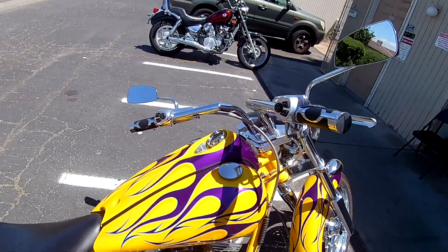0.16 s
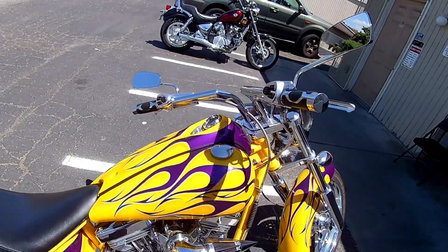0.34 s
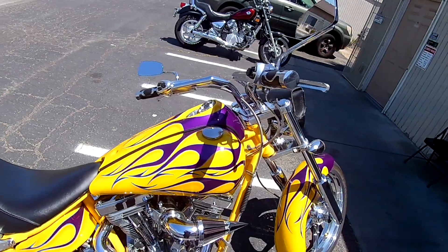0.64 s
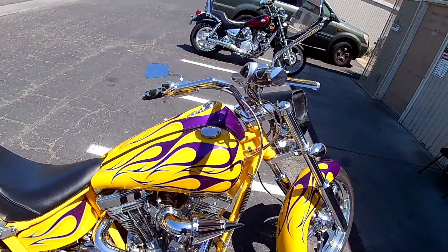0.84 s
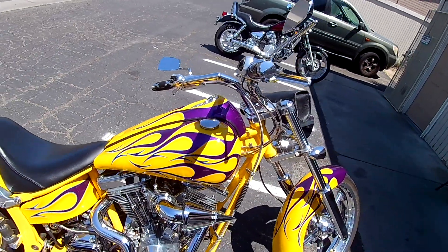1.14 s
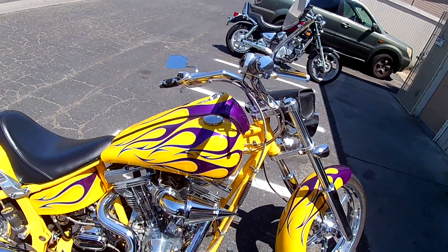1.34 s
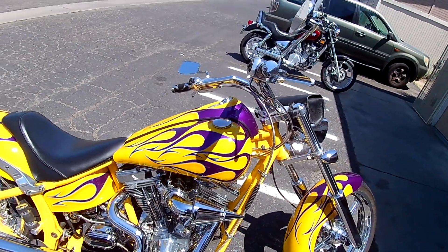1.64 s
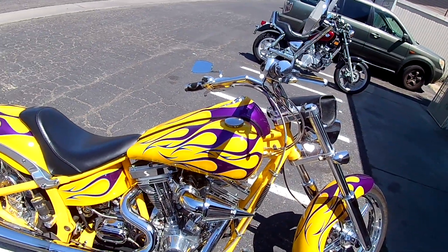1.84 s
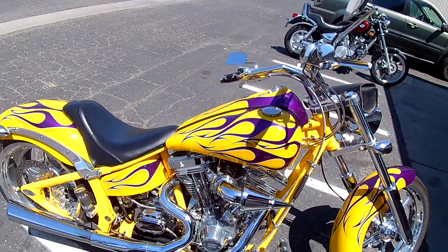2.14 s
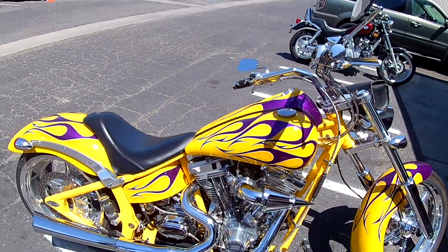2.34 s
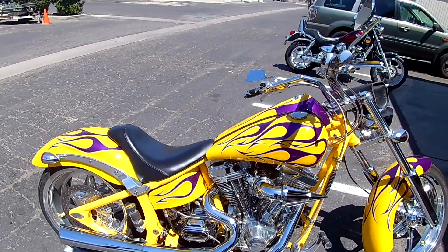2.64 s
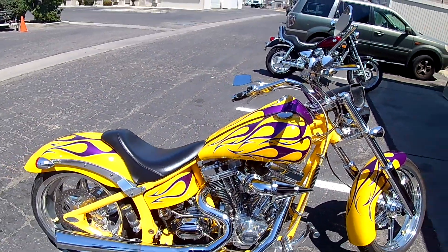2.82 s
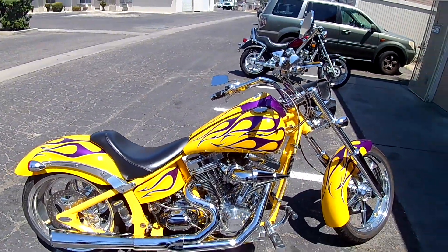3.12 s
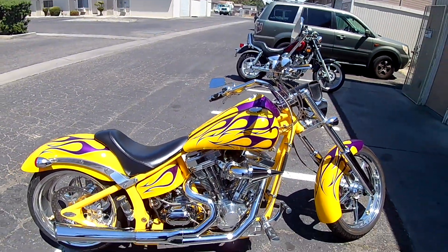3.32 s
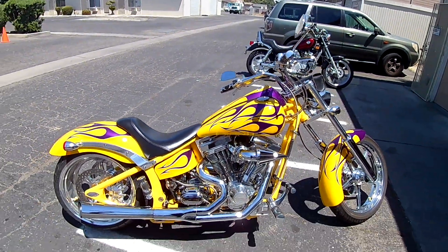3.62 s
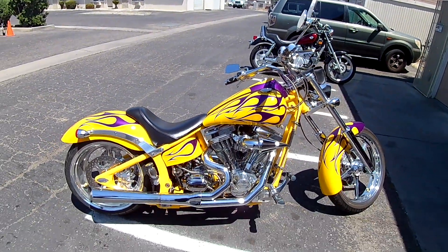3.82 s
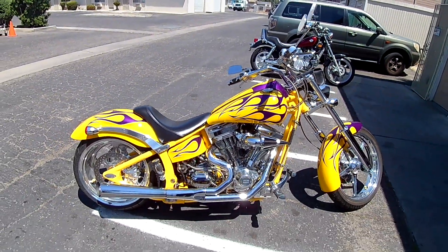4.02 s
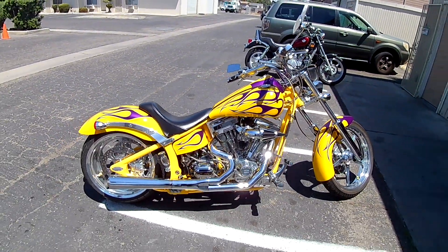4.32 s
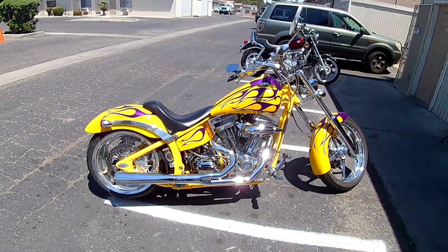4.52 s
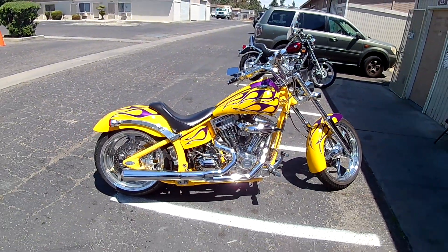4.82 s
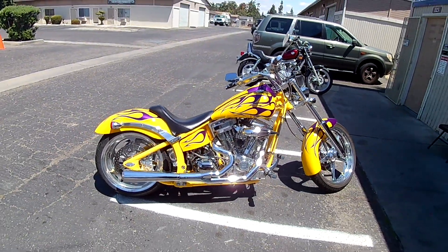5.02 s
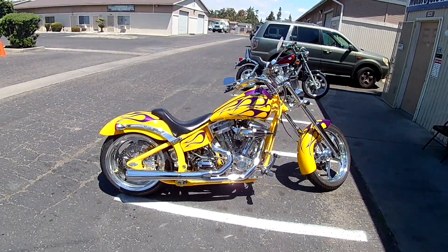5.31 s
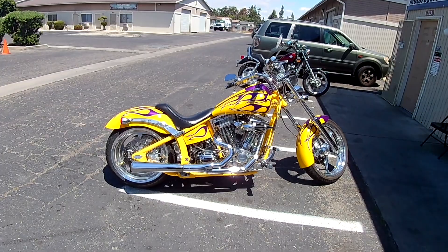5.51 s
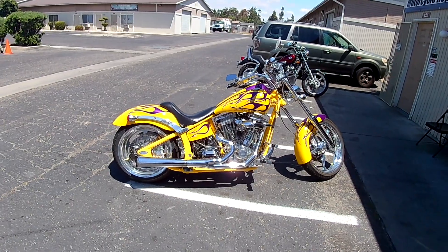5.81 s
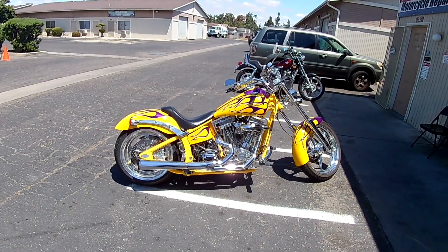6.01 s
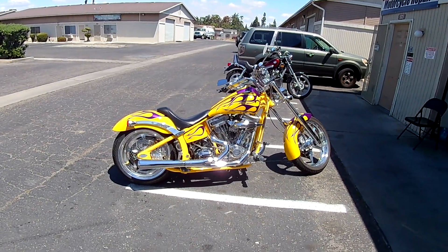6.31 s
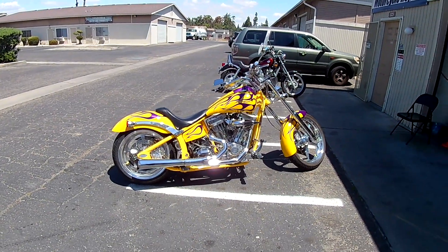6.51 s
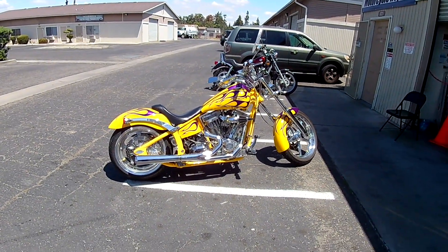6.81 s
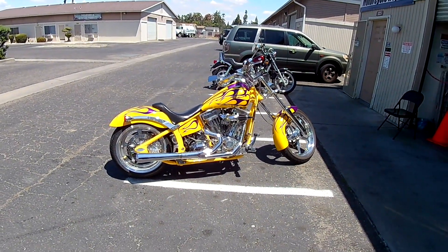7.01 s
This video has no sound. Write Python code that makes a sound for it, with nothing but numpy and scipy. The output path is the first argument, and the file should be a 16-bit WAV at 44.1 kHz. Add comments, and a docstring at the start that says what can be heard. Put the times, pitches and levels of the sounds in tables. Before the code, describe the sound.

Deep, lumpy thumping of an idling motorcycle, with paired exhaust cracks, metallic engine clatter and a few low gusts of wind.

```python
"""From the start a big V-twin chopper lopes at a slow idle through open pipes in a parking lot.
Its cylinders fire mostly in pairs and miss in between: every exhaust stroke sets the pipes booming,
and each firing cracks. At first the listener is beside the tank, near the clatter and carburettor hiss.
After about a second a breeze starts to buffet the microphone in gusts. From about two seconds on the
listener backs away to the pipe side, where the clatter fades and the cracks grow stronger."""
import sys
import numpy as np
from scipy import signal
from scipy.fft import rfft, irfft, next_fast_len
from scipy.io import wavfile
from scipy.ndimage import uniform_filter1d

SR = 44100
rng = np.random.default_rng(int(sys.argv[2]) if len(sys.argv) > 2 else 0)


def put_to_file(sound):
    """Save the sound as 16-bit audio at rate SR, in the file named by the first command-line argument."""
    columns = np.atleast_2d(sound).T  # one column per channel
    safe = np.clip(columns, -1, 1)
    whole_steps = np.round(safe * 32767)
    wavfile.write(sys.argv[1], SR, whole_steps.astype(np.int16))


N = 315315
TIME = np.arange(N) / SR

# firings, mostly in pairs, front cylinder then rear: start_s, boom_db, boom_start_hz, valve_open_s,
# crack_db, edge_db, low_bark_hz, low_bark_db, high_bark_hz, high_bark_db
FIRINGS = [(-0.042, 2.5, 52.3, 0.07, -33, -49.5, 980, -40.5, 1217, -46.0),
           (0.0329, 1.0, 54.6, 0.092, -30.5, -49.5, 680, -39.0, 1367, -38),
           (0.3161, 0, 57.9, 0.069, -29.5, -43.0, 630, -29, 990, -32),
           (0.4237, 3.0, 52.8, 0.082, -32, -51.0, 650, -33.0, 1744, -35),
           (0.7065, 2, 56, 0.085, -30, -39.5, 926, -38, 1744, -39.0),
           (0.8186, 2, 51.8, 0.071, -32.5, -45, 668, -36, 980, -43),
           (1.1106, 1, 57.5, 0.085, -28.5, -59, 950, -39, 1227, -40),
           (1.2063, 2.0, 56, 0.09, -31.5, -36.0, 1012, -39.0, 1346, -42),
           (1.4877, -2, 54.8, 0.13, -29.5, -48.5, 969, -45, 1238, -36),
           (1.7277, -0.5, 57, 0.07, -28.5, -41.5, 1244, -36.5, 1590, -34),
           (1.8429, 1.5, 53, 0.079, -33, -36.5, 1034, -37.0, 1453, -39),
           (2.1512, 0, 55, 0.1, -26.5, -42.5, 790, -37, 1570, -37.5),
           (2.256, 3, 50.7, 0.064, -26, -37.5, 700, -40, 1015, -29),
           (2.5234, 0, 54.6, 0.094, -31, -43.5, 1529, -32, 1850, -35),
           (2.8574, 0.0, 51.7, 0.077, -35, -46.5, 678, -45, 1040, -31),
           (2.946, 1, 56, 0.11, -25.5, -47, 1292, -38, 1518, -28.0),
           (3.271, 0.5, 53.4, 0.09, -33, -60.5, 969, -33.5, 1660, -38.5),
           (3.3542, 0, 54, 0.098, -26.5, -42.5, 1006, -32.5, 1450, -30),
           (3.7063, 0.5, 55.3, 0.096, -30.5, -58.5, 657, -33.5, 958, -32.5),
           (3.7845, 2.5, 53.5, 0.092, -21, -39.5, 1060, -38, 1500, -32),
           (4.1854, -1.5, 58.5, 0.13, -21, -47, 1374, -25, 1634, -23),
           (4.289, -0.5, 52.5, 0.074, -25.0, -52.5, 1046, -28.5, 1660, -28.5),
           (4.594, -2, 55.3, 0.076, -25.5, -45, 820, -32.0, 1624, -23.5),
           (4.7055, 0.5, 50.4, 0.092, -22.5, -39.0, 693, -28.0, 958, -36),
           (4.9896, -2.0, 54, 0.1, -25.5, -44.5, 1350, -29.5, 1640, -28),
           (5.0971, -1, 52, 0.088, -32, -54.5, 650, -36, 1087, -32),
           (5.4132, -2.5, 55.9, 0.12, -24.5, -45.0, 1055, -30, 1367, -38.0),
           (5.521, 2.5, 57.3, 0.074, -25.5, -45, 686, -25, 1450, -44),
           (5.803, -2.5, 54.2, 0.076, -26, -43.5, 870, -31.5, 1790, -33),
           (5.9242, -2.5, 49, 0.081, -37, -55, 660, -40, 1430, -35),
           (6.2364, -3, 55.4, 0.069, -29.5, -47, 894, -39, 1410, -41),
           (6.352, -3.5, 55.3, 0.081, -33.5, -53, 670, -35, 1650, -40),
           (6.689, -4, 57.7, 0.068, -28, -42, 1095, -33, 1680, -30),
           (6.8, 0.0, 52.7, 0.083, -26.5, -43, 700, -30.5, 1054, -26.5)]
# exhaust strokes without a bang: start_s, boom_db, boom_start_hz, valve_open_s, intake_lag_s, hiss_db
MISFIRES = [(0.1233, 0.5, 55.3, 0.058, 0.012, -55.5), (0.234, -6, 53, 0.11, -0.0, -53.5),
            (0.511, 1, 49.3, 0.082, 0.013, -55.0), (0.6223, 1, 51.5, 0.082, 0.00024, -54.5),
            (0.8983, -2.0, 56.6, 0.111, 0.045, -54.5), (1.0209, 3.5, 54.3, 0.094, 0.01, -55),
            (1.29, -2, 52.6, 0.09, 0.015, -55.5), (1.4006, 2.0, 50.9, 0.093, 0.0054, -56.5),
            (1.6247, 1.5, 54.2, 0.1, 0.0059, -52), (1.919, 0.5, 54.6, 0.082, 0.032, -55.5),
            (2.0559, -2, 49.7, 0.081, 0, -55.5), (2.3383, 0.5, 55, 0.1, 0.0075, -60.5),
            (2.4455, 2, 53, 0.083, 0, -60), (2.6172, -7, 54.5, 0.133, 0.033, -55.5),
            (2.7353, -4, 52.1, 0.09, 0.021, -57), (3.054, 0.5, 47.2, 0.059, 0.0038, -59.5),
            (3.1448, 0, 50.8, 0.09, 0.021, -56), (3.46, 1, 52.5, 0.1, 0.02, -60),
            (3.573, -4, 53.3, 0.18, 0.016, -56.5), (3.8895, 3.5, 52, 0.051, 0.008, -60.5),
            (3.9754, -0.5, 55, 0.14, 0.012, -59.5), (4.0975, -4.5, 49.4, 0.112, 0.0032, -60.5),
            (4.362, 2.5, 55.2, 0.098, 0.029, -62.5), (4.497, 0, 46.5, 0.078, 0.0014, -58),
            (4.8118, -6, 54.2, 0.12, 0.0015, -61), (4.9062, -1.5, 50.9, 0.086, 0.0032, -56),
            (5.1776, -2.5, 53.6, 0.13, 0.035, -57.5), (5.3032, -2, 50, 0.08, 0.023, -59.5),
            (5.6223, -2.5, 52.7, 0.074, 0, -65), (5.7163, -2.5, 49.8, 0.082, 0.004, -60.5),
            (6.0101, -4, 56.4, 0.13, 0.028, -64.5), (6.1317, -4, 50.9, 0.096, 0.02, -61.0),
            (6.45, -2.5, 53, 0.11, 0.018, -62.5), (6.5551, -12.5, 56, 0.09, 0.031, -65.0),
            (6.9036, -5.5, 56.3, 0.12, 0.006, -69.5), (6.9966, -3, 53.2, 0.097, 0.007, -61),
            (7.0948, -2, 55.7, 0.067, 0.018, -63)]
# directivity of the pipe mouths along the listener's path: time_s, edge_db, ring_db, burble_db
DIRECTIVITY = [(0, -4.5, -4, -1.5), (1.2, -12, 6.5, -1), (2.3, -8.5, 3, 5.5), (3.7, -1.5, 3, 1.5),
               (4.6, 3, -11, 5.5), (5.8, -0.5, -3, 3.5), (7.15, -4.5, -7, 6)]


def pipes(stroke_s=0.104):
    """Normal modes: every exhaust stroke starts the boom afresh; a firing also excites higher modes."""
    # booms of the front pipe, the rear pipe and a misfire: glide_hz_per_s, level_db, closing_s, attack_s
    front, rear, unfired = [(165, -11, 0.005, 0.0034), (277, -11, 0.0039, 0.0021),
                            (200, -14.5, 0.011, 0.0011)]
    # higher pipe modes: pitch_hz, level_db, decay_s
    pipe_modes = [(96, -17, 0.016), (173.4, -27, 0.046), (201.4, -28.5, 0.032)]
    # the rear cylinder fires about one stroke after the front
    is_rear = np.diff(np.array(FIRINGS)[:, 0], prepend=-1) < 1.5 * stroke_s
    out = np.zeros(N)
    for (s, db, start_hz, open_s, *_), from_rear in zip(FIRINGS, is_rear):
        span, age = after(s)
        pipe = rear if from_rear else front
        modes = sum((-1) ** k * from_db(mode_db) * np.sin(2 * np.pi * hz * age) * np.exp(-age / decay_s)
                    for k, (hz, mode_db, decay_s) in enumerate(pipe_modes))
        out[span] += from_db(db) * (boom(age, start_hz, open_s, *pipe) + modes)
    for s, db, start_hz, open_s, *_ in MISFIRES:
        span, age = after(s)
        out[span] += from_db(db) * boom(age, start_hz, open_s, *unfired)
    return out


def boom(age, start_hz, open_s, glide_hz_per_s, db, closing_s, attack_s):
    """Cavity resonance while the valve is open: the rising piston shrinks the volume, lifting the pitch."""
    valve = (1 - np.exp(-age / attack_s)) / (1 + np.exp((age - open_s) / closing_s))
    return -from_db(db) * valve * np.sin(2 * np.pi * cycles(age, start_hz, glide_hz_per_s))


def cracks():
    """Impulsive radiation: gas bursts from the pipe mouth at each firing; a wall scatters it back."""
    # spectrum of the crack's body: frequency_hz, density_db
    body_spectrum = [(200, -2), (450, -18), (560, -5), (680, 2.5), (820, 1.5), (1010, 3.5), (1180, -1),
                     (1370, 2.5), (1490, -0.5), (1630, 1.5), (1850, -4.5), (2050, -4.5), (2350, -14.5),
                     (2800, -20), (4000, -50.5)]
    # spectrum of its sharp edge: frequency_hz, density_db
    edge_spectrum = [(1800, -12), (2500, -3.5), (3000, -2.5), (3500, -1), (4200, 0), (5200, -7),
                     (5700, -25.5), (6300, -41.5), (10000, -46.5)]
    # the ring beamed at the listener rises toward the pipe side: time_s, pitch_hz
    ring_pitch = [(1.9, 2110), (2.3, 2640), (3.35, 2530), (3.8, 2980), (4.6, 3120)]
    s, _, _, _, body_db, edge_db, low_hz, low_db, high_hz, high_db = np.transpose(FIRINGS)
    peak_s = s + 0.0058
    edge_gain, ring_gain, _ = from_db(in_time(DIRECTIVITY))
    blast = bursts(peak_s, body_db - 3, half_s=0.0045)
    wall_echo = puffs(s + 0.016, body_db - 13, rise_s=0.016, decay_s=0.022)
    tail = puffs(s + 0.085, body_db - 21, rise_s=0.4, decay_s=0.013)
    edge_envelope = bursts(peak_s, edge_db - 0.5, half_s=0.0032)
    edge_envelope += puffs(s + 0.025, edge_db - 18, rise_s=0.013, decay_s=0.014)  # its echo
    edge = with_ground(edge_envelope * coloured(edge_spectrum) + mouth_ring(edge_envelope))
    bark = hollow_pops(peak_s, low_db, low_hz, bend_hz=50, half_s=0.0068)
    bark += hollow_pops(peak_s, high_db, high_hz, bend_hz=60, half_s=0.0052)
    ring_hz = np.interp(s, *np.transpose(ring_pitch))
    ring = hollow_pops(peak_s, edge_db + 2, ring_hz, bend_hz=132, half_s=0.004)
    body = (blast + wall_echo + tail) * coloured(body_spectrum)
    return body + edge_gain * edge + bark + ring_gain * ring


def mouth_ring(edge_envelope):
    """Forced resonance: the sharp edge of each crack drives the cross modes of the pipe mouths."""
    # cross modes: pitch_hz, width_hz, level_db
    mouth_modes = [(2790, 80, -7), (3010, 39, -10), (3400, 54, -13), (4060, 69, -11.5), (4350, 64, -11.5),
                   (4920, 90, -17)]
    jet = edge_envelope * rng.standard_normal(N) + 1e-18
    return np.std(jet) * sum(from_db(db) * ringing(jet, hz, width, width) for hz, width, db in mouth_modes)


def with_ground(x, lag_s=0.00098, reflection_db=-8.5):
    """Comb filtering: a sound interferes with a weaker reflection from the asphalt; the overall power stays
    about the same."""
    gain = from_db(reflection_db)
    return (x + gain * np.interp(TIME - lag_s, TIME, x)) / np.sqrt(1 + gain ** 2)


def burble(firing_db=-24, misfire_db=-36):
    """Flow noise: turbulent gas follows each stroke down the pipe."""
    # spectrum of the flow: frequency_hz, density_db
    flow_spectrum = [(20, -23.5), (40, -3), (75, -2.5), (110, 0.5), (150, -3.5), (175, -4), (195, 0.5),
                     (225, -17), (260, -18), (400, -24), (600, -50), (1200, -68)]
    fired_s, fired_db, *_ = np.transpose(FIRINGS)
    missed_s, missed_db, *_ = np.transpose(MISFIRES)
    *_, place_db = in_time(DIRECTIVITY)
    flow = puffs(fired_s + 0.011, fired_db + firing_db, rise_s=0.017, decay_s=0.076)
    flow += puffs(missed_s + 0.0043, missed_db + misfire_db, rise_s=0.0058, decay_s=0.049)
    return from_db(place_db) * flow * coloured(flow_spectrum)


def engine(beat_depth=0.3, walk_start_s=1.85, walk_length_s=1.06):
    """Amplitude modulation: clatter, rustle, hiss and jingle all pulse in step with the strokes."""
    # the engine fades with distance: time_s, clatter_db, rustle_db
    engine_level = [(0.0, -36.5, -59.5), (1.77, -37.5, -61), (2.35, -36.5, -59), (3.11, -40, -63.5),
                    (3.94, -40, -62.5), (6.63, -45.5, -69.5), (6.81, -42, -66.5), (7.15, -45, -70)]
    clatter_db, rustle_db = in_time(engine_level)
    side = np.clip((TIME - walk_start_s) / walk_length_s, 0, 1)  # 0 at the tank, 1 at the pipe side
    draw_s, hiss_db = intake_draws()
    swell = puffs(draw_s, np.zeros(len(draw_s)), rise_s=0.092, decay_s=0.0059)
    beat = 1 + beat_depth * (swell - 0.5)
    cases = from_db(clatter_db - 0.33) * clatter(side)
    hiss = carburettor(draw_s, hiss_db, side)
    machinery = surge() * cases + from_db(rustle_db - 1) * rustle()
    shaking = puffs(draw_s, hiss_db, rise_s=0.036, decay_s=0.018)
    return beat * machinery + hiss + jingle(shaking)


def clatter(side):
    """Impact excitation: dense contacts of valve gear and chain ring the engine cases."""
    # spectrum beside the tank: frequency_hz, density_db
    tank_spectrum = [(260, -2), (450, 4.5), (541, -1), (640, -8), (745, -2), (896, -3), (971, -2.5),
                     (1090, -4), (1320, -3.5), (1450, -5.5), (1810, -1), (2180, -14.5), (3050, -31.5),
                     (3960, -59), (6710, -120)]
    # spectrum on the pipe side: frequency_hz, density_db
    side_spectrum = [(260, -66.5), (450, -32.5), (640, -1.5), (769, 2), (1030, -1.5), (1140, -3),
                     (1240, -10.5), (1430, -0.5), (1660, -2), (1840, -4), (1920, -13), (2080, -5),
                     (2270, -14.5), (3050, -38), (3960, -70), (6710, -120)]
    # modes of the cases: pitch_hz, width_hz, tank_db, side_db
    case_modes = [(956, 89, -11.5, -11.5), (1657, 26, -24.5, -9), (1823, 64, -11.5, -11.5),
                  (4035, 890, -34, -30.5), (5310, 99, -37, -33.5)]
    out = np.sqrt(1 - side) * coloured(tank_spectrum, rattling(per_s=2400, spread_db=0.5))
    out += np.sqrt(side) * coloured(side_spectrum, rattling(per_s=2400, spread_db=1.5))
    for hz, width, tank_db, side_db in case_modes:
        taps = rattling(per_s=150, spread_db=2.5)
        out += from_db(tank_db + side * (side_db - tank_db)) * ringing(taps, hz, width, width)
    return out


def surge(kick_db=3.5, wander_db=0.7):
    """Inertia: firings kick the crank on, then it slows; the clatter's gain follows, and also wanders."""
    fired_s = np.array(FIRINGS)[:, 0]
    speed = puffs(fired_s + 0.013, np.zeros(len(fired_s)), rise_s=0.039, decay_s=0.3)
    wander = coloured([(2, -12), (5, 0), (22, 0), (60, -20), (200, -80)])
    return from_db(kick_db * (speed - speed.mean()) + wander_db * wander)


def knocks_and_pops(half_cycles=3.4):
    """Transient resonance: small knocks in the engine and a couple of weak exhaust pops ring briefly."""
    # engine knocks, and weak exhaust pops at 4.909 and 5.719 s: peak_s, level_db, pitch_hz
    transients = [(0.071, -40, 890), (0.11, -33.5, 850), (0.202, -38, 1163), (0.41, -37.0, 1020),
                  (0.484, -36.0, 958), (0.657, -36.0, 991), (0.795, -35.5, 947), (0.865, -37.0, 969),
                  (0.886, -36, 1087), (0.997, -34.5, 958), (1.13, -31.5, 790), (1.467, -37, 851),
                  (1.915, -38.0, 915), (2.016, -33.5, 818), (2.2015, -36, 797), (2.676, -33.5, 926),
                  (2.707, -37.0, 926), (2.832, -35, 904), (3.245, -37.5, 930), (4.078, -36, 1830),
                  (4.909, -36, 904), (5.719, -37, 1012), (6.118, -42, 940), (6.453, -38.5, 900),
                  (6.546, -39, 937), (6.587, -40.5, 1637), (6.707, -29.5, 790), (6.972, -36.5, 1670)]
    s, db, hz = np.transpose(transients)
    return hollow_pops(s, db, hz, bend_hz=150, half_s=half_cycles / hz)


def click():
    """A brief impact has a broad spectrum: metal snaps on metal, shorter and brighter than the knocks."""
    # a lone snap: peak_s, level_db, pitch_hz
    snaps = [(2.201, -27, 2230)]
    s, db, hz = np.transpose(snaps)
    return hollow_pops(s, db, hz, bend_hz=350, half_s=0.0008)


def intake_draws(firing_lag_s=0.02):
    """Suction: times and levels of the carburettor's draws of air, one for each stroke."""
    # the hiss after a firing is loudest beside the tank: time_s, level_db
    intake_level = [(0, -55.5), (1.5, -52), (2.2, -59), (5, -61), (7.15, -65)]
    fired_s = np.array(FIRINGS)[:, 0] + firing_lag_s
    fired_db = np.interp(fired_s, *np.transpose(intake_level))
    missed_s, *_, lag_s, missed_db = np.transpose(MISFIRES)
    return np.append(fired_s, missed_s + lag_s), np.append(fired_db - 3.5, missed_db - 4)


def carburettor(draw_s, hiss_db, side):
    """Flow noise: each sip of air hisses, in a colour that depends on the listener's place."""
    # spectrum above the tank: frequency_hz, density_db
    tank_spectrum = [(3000, -21), (4100, -7.5), (4500, -12.5), (5050, -3), (5600, 0.5), (5900, 1),
                     (6300, -10), (6900, -7.5), (7600, -38.5)]
    # spectrum on the pipe side: frequency_hz, density_db
    side_spectrum = [(3000, -26.5), (3800, -18.5), (4100, -5.5), (4400, -12), (5050, 4), (5330, 2.5),
                     (5550, -6.5), (5850, -8.5), (6200, -25), (6900, -17), (7600, -40.5)]
    air = np.sqrt(1 - side) * coloured(tank_spectrum) + np.sqrt(side) * coloured(side_spectrum)
    return puffs(draw_s, hiss_db, rise_s=0.0099, decay_s=0.006) * air


def rustle():
    """Broadband noise: a fine, high rustle lies over the engine's clatter."""
    # spectrum of the rustle: frequency_hz, density_db
    rustle_spectrum = [(2400, -6.5), (3000, -1.5), (3500, -4.5), (4100, -2.5), (4700, 1), (5400, -3),
                       (6100, -12.5), (6900, -12.5), (7600, -29.5), (10500, -14), (15500, -28)]
    return coloured(rustle_spectrum)


def jingle(shaking, level_db=-63):
    """Impact excitation: loose contacts ring thin metal parts, harder while a stroke shakes the engine."""
    # one mode for each part: pitch_hz, width_hz, level_db
    part_modes = [(4080, 42, -4), (4320, 45, -7.5), (4850, 45, -4.5), (5030, 45, -4.5), (5340, 45, 0.5),
                  (5580, 45, -3), (5820, 49, -8.5)]
    out = np.zeros(N)
    for hz, width, db in part_modes:
        taps = shaking * rattling(per_s=130, spread_db=3)
        out += from_db(db) * ringing(taps, hz, width, 400)
    return from_db(level_db) * rms_one(out)


def breeze(gain_db=8.5, lumpy_db=3):
    """Turbulent pressure fluctuations: low, lumpy buffeting on the microphone."""
    # strength of the gusts: time_s, level_db
    gusts = [(0, -39.5), (0.92, -41.5), (1.2, -28.5), (1.35, -33.5), (1.68, -30), (1.8, -34), (2.27, -31),
             (2.8, -40), (3.12, -34.5), (3.54, -42), (3.65, -28.5), (4.42, -30.5), (4.6, -41), (5.24, -46),
             (5.37, -23.5), (5.5, -43), (6.4, -42.5), (7.15, -45)]
    # spectrum of the buffeting: frequency_hz, density_db
    wind_spectrum = [(12, -23), (30, -2), (80, 8), (160, -4), (300, -10.5), (450, -18), (700, -25),
                     (1500, -67.5)]
    gust_db, = in_time(gusts)
    lumps = coloured([(1, -12), (4, 0), (25, -5), (80, -30), (300, -90)])
    return from_db(gust_db + gain_db + lumpy_db * lumps) * coloured(wind_spectrum)


def hollow_pops(times, levels_db, pitches_hz, bend_hz, half_s):
    """Tone bursts: one resonance sounds briefly around each time, bending up or down by chance."""
    out = np.zeros(N)
    halves = np.broadcast_to(half_s, len(times))
    chances = rng.standard_normal((len(times), 2))
    for s, db, hz, half, (bend, phase) in zip(times, levels_db, pitches_hz, halves, chances):
        span, _ = after(s - 0.1)
        age = TIME[span] - s
        tone = np.sqrt(2) * np.sin(2 * np.pi * (phase + cycles(age, hz, bend * bend_hz / half)))
        out[span] += from_db(db) * np.exp(-(age / half) ** 4) * tone
    return out


def puffs(times, levels_db, rise_s, decay_s):
    """Power addition: the envelope of puffs that swell up to each time and die away after it."""
    power = np.zeros(N)
    for s, db in zip(times, levels_db):
        span, age = after(s - 0.1)
        age = age - 0.1  # zero at the peak
        power[span] += (from_db(db) * np.exp(np.where(age < 0, age / rise_s, -age / decay_s))) ** 2
    return np.sqrt(power)


def bursts(times, levels_db, half_s):
    """Amplitude addition: the envelope of short, flat-topped blasts centred on each time."""
    out = np.zeros(N)
    for s, db in zip(times, levels_db):
        span, _ = after(s - 0.1)
        out[span] += from_db(db) * np.exp(-((TIME[span] - s) / half_s) ** 4)
    return out


def rattling(per_s, spread_db):
    """A Poisson process: small impulses of random sign and uneven size."""
    impulses = (rng.random(N) < per_s / SR) * rng.choice([-1, 1], N)
    return impulses * from_db(spread_db * rng.standard_normal(N))


def ringing(x, hz, *widths_hz):
    """Resonance: two-pole resonators in series at one pitch, one for each bandwidth; rms 1."""
    for width_hz in widths_hz:
        r = np.exp(-np.pi * width_hz / SR)
        numerator = np.sqrt((1 - r * r) / 2) * np.array([1, 0, -1])
        x = signal.lfilter(numerator, [1, -2 * r * np.cos(2 * np.pi * hz / SR), r * r], x)
    return rms_one(x)


def coloured(spectrum, source=None):
    """Spectral shaping of white noise or another flat source by (frequency_hz, density_db) rows; rms 1."""
    source = rng.standard_normal(N) if source is None else source
    hz, db = np.transpose(spectrum)
    size = next_fast_len(N)
    bins_hz = np.maximum(np.fft.rfftfreq(size, 1 / SR), 1)
    gain = from_db(np.interp(np.log(bins_hz), np.log(hz), db))
    return rms_one(irfft(rfft(source, size) * gain, size)[:N])


def cycles(age, start_hz, glide_hz_per_s):
    """Phase of a linear chirp, in cycles."""
    return start_hz * age + glide_hz_per_s * age ** 2 / 2


def after(start_s):
    """The samples of the half second from a moment on, and their age in s."""
    span = slice(max(int(start_s * SR) + 1, 0), int((start_s + 0.5) * SR))
    return span, np.maximum(TIME[span] - start_s, 0)


def in_time(rows):
    """Linear interpolation of a curve's columns at every sample."""
    s, *columns = np.transpose(rows)
    return [np.interp(TIME, s, column) for column in columns]


def from_db(db):
    return 10 ** (np.asarray(db) / 20)


def rms_one(x):
    return x / np.sqrt(np.mean(x ** 2) + 1e-20)


def scene():
    """Superposition of exhaust, engine and breeze at one microphone."""
    exhaust = pipes() + burble() + cracks()
    return (exhaust + engine() + knocks_and_pops() + click() + breeze())[None]


def record(dry, sizzle_db=-55, low_cut_hz=10, stopband_hz=16500):
    """Modulation noise and band limiting: a faint sizzle rides the loud beats; both extremes are cut."""
    # spectrum of the sizzle: frequency_hz, density_db
    sizzle_spectrum = [(3000, -24.5), (6500, -17), (7600, -17.5), (8400, 3), (11000, -1), (15500, 1)]
    envelope = np.sqrt(np.abs(uniform_filter1d(dry ** 2, size=900, axis=-1)))
    sound = dry + from_db(sizzle_db) * envelope * coloured(sizzle_spectrum)
    sound = signal.sosfilt(signal.butter(1, low_cut_hz, "high", fs=SR, output="sos"), sound)
    return signal.sosfilt(signal.cheby2(14, 70, stopband_hz, fs=SR, output="sos"), sound)


dry = scene()
out = record(dry)
put_to_file(out)
```